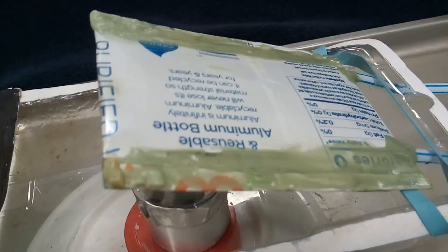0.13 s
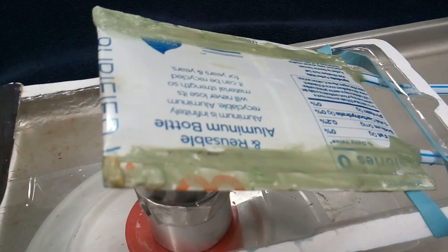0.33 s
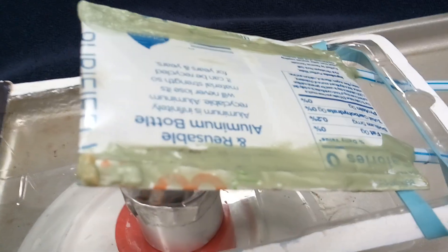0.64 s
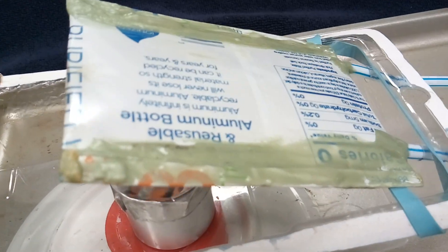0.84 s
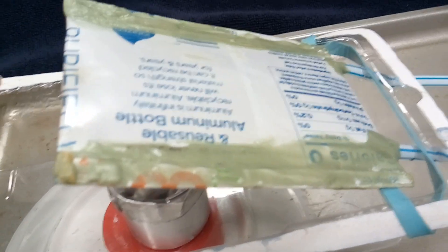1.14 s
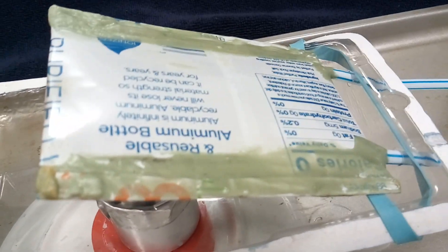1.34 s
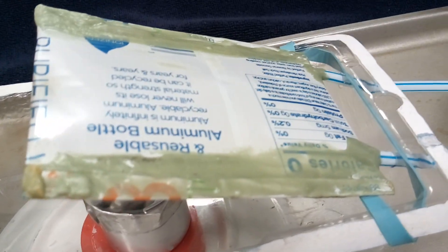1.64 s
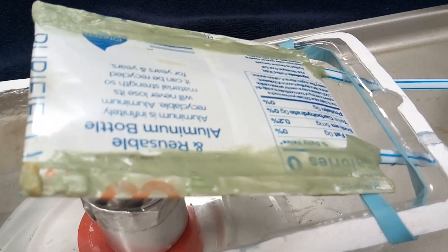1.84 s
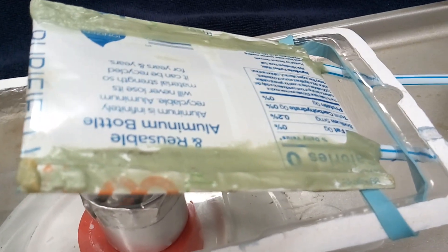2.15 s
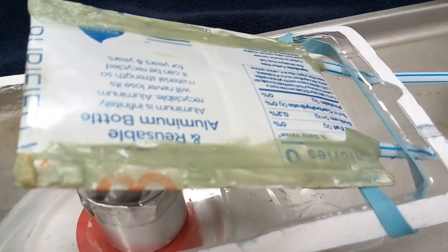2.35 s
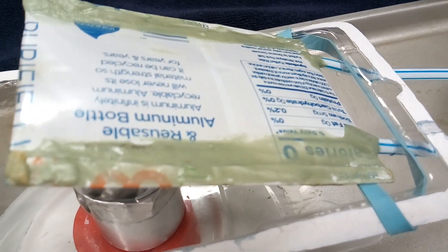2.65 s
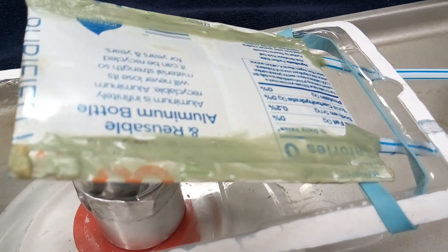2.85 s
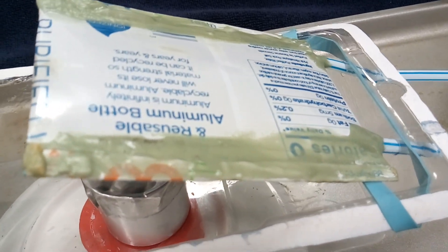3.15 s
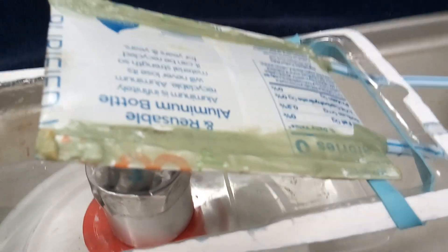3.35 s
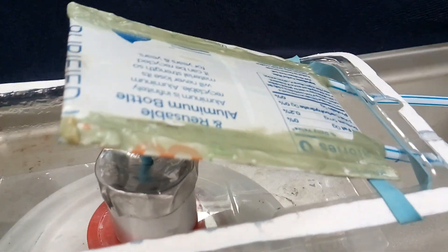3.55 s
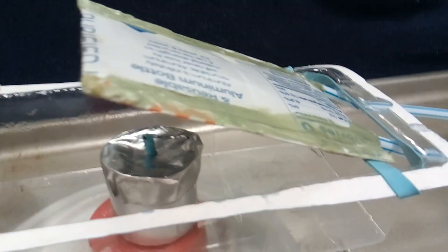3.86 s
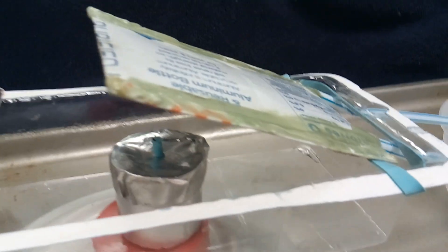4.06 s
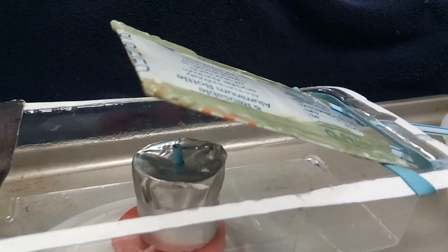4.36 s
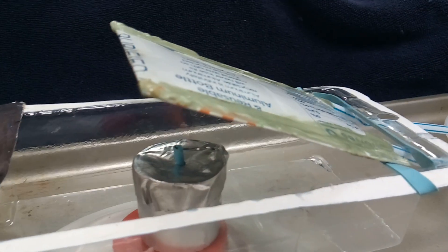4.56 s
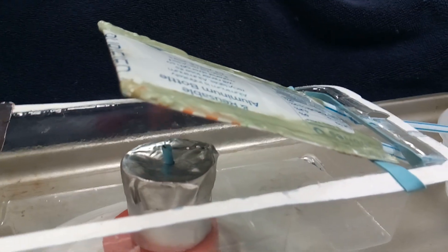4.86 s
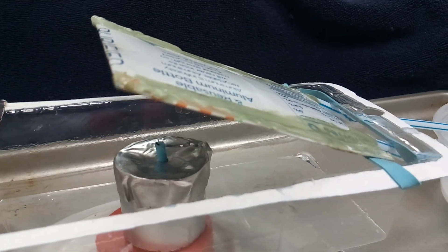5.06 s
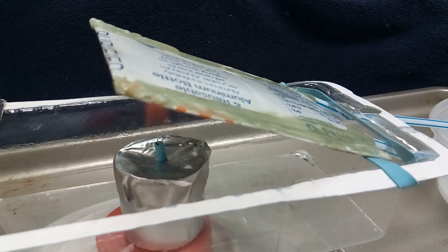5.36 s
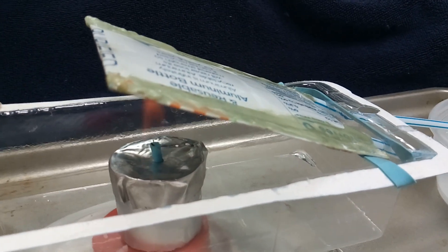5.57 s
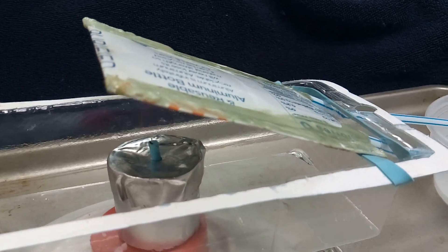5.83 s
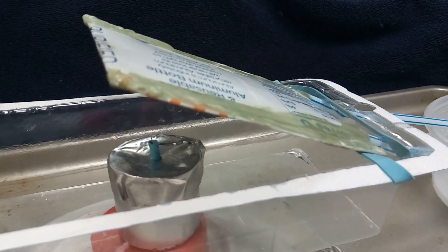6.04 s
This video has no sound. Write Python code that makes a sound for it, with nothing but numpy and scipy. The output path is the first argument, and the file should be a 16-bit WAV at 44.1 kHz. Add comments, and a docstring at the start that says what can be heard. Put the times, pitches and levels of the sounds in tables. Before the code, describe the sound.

A toy boat's candle-heated metal boiler pops steadily, a little over twice a second. Each bright, tinny snap is followed at once by a duller knock as the thin sheet flops back. Water sizzles faintly inside, with a few tiny high ticks. Near the end the pops turn softer and duller. The sound is close, with a short small-room ring over a low rumble and light hiss.

```python
"""A toy boat's candle-heated sheet-metal boiler: steam snaps the flat sheet out with a bright pop;
it flops back with a duller knock as the steam condenses. Each snap rings a small room and the low
resonances of stand and room. Water sizzles and ticks in the boiler over a low indoor rumble,
hiss and a faint whine."""
import sys
import numpy as np
from scipy import signal
from scipy.fft import rfft, irfft, next_fast_len
from scipy.io import wavfile
from scipy.ndimage import uniform_filter1d, map_coordinates

SR = 44100
rng = np.random.default_rng(int(sys.argv[2]) if len(sys.argv) > 2 else 0)


def master_out(mix):
    """Clip the mix to full scale and print it as 16-bit PCM to the path in sys.argv[1]."""
    frames = np.transpose(np.atleast_2d(mix))
    ceiling = np.clip(frames, -1, 1)
    pcm = np.round(ceiling * 32767).astype(np.int16)
    wavfile.write(sys.argv[1], SR, pcm)


N = 273420

# Sheet snaps out: start_s, thump_db, body_db, body_hz, rim_db, edge_db, edge_hz, sizzle_db
POPS = [(-0.055, -33.5, -20.5, 1366, -38, -47, 2960, -64.5), (0.381, -27, -20, 1330, -40, -40, 2870, -66.5),
        (0.8339, -26, -19, 1336, -37, -39.5, 2900, -66.5),
        (1.2847, -26.5, -19, 1340, -36.5, -39.5, 2890, -64),
        (1.7365, -26.5, -19.5, 1335, -38, -41.5, 2890, -66),
        (2.1812, -27.5, -19.5, 1333, -37, -40.5, 2910, -74.5),
        (2.6352, -29, -23, 1310, -41.5, -42.5, 2900, -66.5),
        (3.0866, -27, -22, 1280, -40, -47.5, 2870, -70), (3.5414, -26.5, -22, 1284, -39, -50, 2810, -71),
        (3.995, -27.5, -20.5, 1295, -35, -47, 2960, -72), (4.4478, -28.5, -21.5, 1306, -38, -50, 2940, -72),
        (4.893, -27.5, -21.5, 1306, -36, -46, 2950, -71), (5.3351, -27.5, -26, 1280, -52, -48, 2690, -68.5),
        (5.7856, -28, -28, 1253, -51, -54.5, 3040, -73)]
# Sheet flops back: start_s, thump_db, body_db, body_hz, rim_db, edge_db, edge_hz
KNOCKS = [(0.0925, -36, -29, 465, -31, -40.5, 1990), (0.5535, -36, -29, 474, -33, -48.5, 2060),
          (1.0035, -35, -28, 460, -33, -43.5, 1960), (1.4548, -37, -27.5, 480, -31.5, -41, 1990),
          (1.9035, -36.5, -29.5, 486, -32, -44.5, 2030), (2.3495, -37, -29.5, 465, -35, -44, 1980),
          (2.8015, -35, -31, 474, -33.5, -40.5, 1980), (3.2555, -35.5, -36, 465, -32, -44, 1970),
          (3.7095, -35.5, -28.5, 428, -29.5, -38.5, 1940), (4.1635, -36.5, -29, 434, -29, -38, 1980),
          (4.6095, -36.5, -28.5, 460, -32.5, -43, 1910), (5.0595, -36, -39.5, 515, -47, -61, 2000),
          (5.5055, -41, -47.5, 470, -48, -63, 2110), (5.9515, -35.5, -38.5, 377, -35, -50, 2020)]
# Brief swings per snap; thump is the whole sheet's low push: nominal_hz, peak_ms, rise_ms, fall_ms, gain_db
POP_BODY = [(1328, 1.108, 0.5, 0.56, 3), (1534, 4.695, 1.1, 1.8, -20.5), (1050, 3.5, 1.1, 1.8, -48),
            (618.4, 1.66, 3.6, 2.44, -19.5)]
POP_RIM = [(2138, 1.266, 1, 0.52, 3.5), (1900, 2.88, 0.27, 0.7, 1)]
POP_EDGE = [(2930, 1.304, 0.93, 2.5, -1), (3440, 1.1, 0.4, 0.76, -5.5), (5030, 1, 0.83, 0.93, -24),
            (6550, 0.46, 0.38, 1, -16)]
POP_THUMP = [(302, 3, 1.32, 1.91, -6), (460, -2.5, 3.4, 3.3, -23), (213, 19, 1.43, 4.5, -6)]
KNOCK_BODY = [(464, 2.81, 1.33, 2.34, -3), (669, 5.56, 1.76, 0.4, -5.5), (564, 6.26, 0.14, 2.3, -7.5)]
KNOCK_RIM = [(1154, 3.53, 1.1, 1.26, -3.5), (1522, 14, 4.6, 3.6, -22), (918, 7.16, 2.1, 0.74, -2)]
KNOCK_EDGE = [(1944, 3.6, 0.46, 2.13, -1), (2830, 2.45, 0.9, 0.52, -14.5), (3480, 3.5, 1.1, 2.1, -22),
              (6170, 8.2, 1.6, 1.6, -24.5)]
KNOCK_THUMP = [(232, 5.04, 0.87, 1.03, 5.5), (340, 1.46, 2.8, 0.54, -9.5), (211.4, 17.93, 1.96, 5, -2)]
# Low resonances of stand and room: pitch_hz, gain_db, t60_s
BOOM_MODES = [(94.7, -13, 0.94), (159.2, -6, 0.28), (215.9, -13, 0.28), (271.4, -20.5, 1), (327, -7, 0.19),
              (387, -15.5, 0.28), (441.6, -5, 0.14), (566, -10.5, 0.23), (634, -4.5, 0.14),
              (712, -2.5, .14), (848, -11.5, 0.18)]
# Room decay: freq_hz, t60_s
ROOM_DECAY = [(200, 0.54), (700, 0.27), (1400, 0.23), (3000, 0.36), (7000, 0.18)]
# Collapsing bubbles: start_s, level_db, pitch_hz, tap_gain_db
BUBBLES = [(0.3413, -45, 6400, -3), (0.8636, -44, 6160, -8), (0.925, -45, 4970, 13),
           (1.7945, -44, 6270, -9), (2.234, -40, 6450, -2), (2.2518, -43.5, 6600, 14),
           (2.622, -45, 6500, 12), (2.716, -48.5, 4170, 1), (3.515, -47.5, 6540, -8),
           (3.616, -52, 6950, 18), (3.815, -29.5, 6150, -19), (3.945, -42, 5150, 6), (5.1033, -47, 6060, 4),
           (5.3911, -50, 6450, 3), (5.5094, -55, 4670, -8), (5.8647, -51, 6700, 17.5)]
# Noise spectra: freq_hz, relative_density_db
SIZZLE_SPECTRUM = [(1500, -21), (3000, -6.5), (4300, -6.5), (5400, -5.5), (6500, 2), (7200, -5.5),
                   (8200, -45), (12000, -38)]
RUMBLE_SPECTRUM = [(15, -67), (25, -9.5), (43, -25.5), (91, -2), (137, 2), (238, -17.5), (477, -20),
                   (1200, -56), (1560, -101), (2640, -120)]
HISS_SPECTRUM = [(290, -31.5), (500, -0.5), (915, 1), (4020, -10), (5130, -11.5), (6650, -7), (8490, -19.5),
                 (13100, -23), (14900, -17.5), (15500, -8.5)]
# Rumble envelope: time_s, level_db
RUMBLE_LEVELS = [(0.0, -55), (0.26, -53.5), (1.28, -60.5), (1.5, -54.5), (2.12, -57), (2.68, -51.5),
                 (3.94, -61), (5.63, -54.5), (6.2, -61)]

RATTLE_BAND = signal.butter(3, [1100, 3800], "band", fs=SR, output="sos")
PRE_ONSET_S = 0.012
SCATTER_DB = 2.5  # mode spread, snap to snap


def sheet_snaps(events, body, rim, edge, thump, rattle_db, rattle_peak_s, wake_db, boom_db, boom_delay_s):
    """The sheet buckles: a click and a low push, both driving room tail and boom."""
    lead = SR // 4  # holds a snap begun before 0 s
    out = np.zeros(lead + N + SR)
    shared_tail = room_tail()
    t = np.arange(SR // 25) / SR - PRE_ONSET_S
    rattle_envelope = amp(-60 * np.abs(t - rattle_peak_s) / np.where(t < rattle_peak_s, 0.012, 0.035))
    for start_s, thump_db, body_db, body_hz, rim_db, edge_db, edge_hz, *_ in events:
        push = amp(thump_db) * sheet_swing(thump, thump[0][0])
        click = amp(body_db) * sheet_swing(body, body_hz)
        click += amp(rim_db) * sheet_swing(rim, rim[0][0])
        click += amp(edge_db) * sheet_swing(edge, edge_hz)
        # finer modes blur into a rattle
        rattle = signal.sosfilt(RATTLE_BAND, rattle_envelope * rng.standard_normal(len(t)))
        click += amp(edge_db + rattle_db) * rattle
        tail = 0.55 * shared_tail + 0.85 * room_tail()
        dullness_db = thump_db - body_db
        sound = amp(-7.5 + 0.3 * dullness_db) * signal.fftconvolve(click + amp(-6) * push, tail)
        boom_drive = push + amp(wake_db + dullness_db) * click
        sound += amp(boom_db) * signal.fftconvolve(boom_drive, boom(boom_delay_s))
        sound[:len(click)] += click + push
        out[lead + round((start_s - PRE_ONSET_S) * SR):][:len(sound)] += sound
    return out[lead:lead + N]


def sheet_swing(modes, pitch_hz):
    """A few cycles per mode under a skewed Gaussian; all tuned so the first lands on pitch_hz."""
    t_ms = (np.arange(SR // 25) / SR - PRE_ONSET_S) * 1000
    tuning = pitch_hz / modes[0][0]
    out = np.zeros(len(t_ms))
    for k, (hz, peak_ms, rise_ms, fall_ms, gain_db) in enumerate(modes):
        gain = amp(gain_db + SCATTER_DB * rng.normal() * (k > 0))
        width_ms = np.where(t_ms < peak_ms, rise_ms, fall_ms)
        envelope = np.exp(-0.5 * ((t_ms - peak_ms) / width_ms) ** 2)
        out -= gain * envelope * np.cos(2 * np.pi * hz * tuning * (t_ms - peak_ms) / 1000)
    return out


def boom(delay_s, swell_s=0.0072, waver_rad=1.2):
    """Stand and room modes swell and waver as echoes return; neighbours alternate in sign."""
    t = np.arange(SR // 2) / SR
    knots_s = np.arange(13) / 24
    ring = np.zeros(len(t))
    for k, (hz, gain_db, t60_s) in enumerate(BOOM_MODES):
        envelope = amp(gain_db + SCATTER_DB * rng.normal() - 60 * t / t60_s)
        drift_rad = np.interp(t, knots_s, waver_rad * rng.standard_normal(13) * (knots_s > 0))
        ring += (-1) ** k * envelope * np.sin(2 * np.pi * hz * t + drift_rad)
    ring *= 1 - np.exp(-t / swell_s)
    return np.pad(ring, (round(delay_s * SR), 0))[:len(t)]


def room_tail(build_up_s=0.004):
    """Diffuse reflections: noise decaying per band, unit energy."""
    hz, t, bands = signal.stft(rng.standard_normal(SR // 2), SR, nperseg=256)
    decay = amp(-60 * t / log_interp(ROOM_DECAY, hz)[:, None])
    tail = signal.istft(bands * decay, SR, nperseg=256)[1][:SR // 2]
    tail *= np.clip(np.arange(len(tail)) / SR / build_up_s, 0, 1) ** 2
    return tail / np.linalg.norm(tail)


def bubble_ticks():
    """Bubbles collapse on hot metal: two-tone ring, sharp spit, tap on the sheet, room tail."""
    out = np.zeros(N + SR)
    t = np.arange(SR // 50) / SR
    attack = (1 - np.exp(-t / 0.00048)) ** 2
    tap_tones = np.sin(2 * np.pi * 2900 * t) + np.sin(2 * np.pi * 4300 * t)
    for start_s, level_db, pitch_hz, tap_db in BUBBLES:
        phase = 2 * np.pi * pitch_hz * t
        ring = amp(-60 * t / 0.007) * (np.sin(phase) + 0.62 * np.sin(1.058 * phase))
        spit = amp(-17 - 60 * t / 0.0042) * np.sin(1.38 * phase)
        tap = amp(tap_db - 60 * t / 0.0021) * tap_tones
        click = amp(level_db) * attack * (ring + spit + tap)
        sound = amp(-6) * signal.fftconvolve(click, room_tail())
        sound[:len(click)] += click
        out[round(start_s * SR):][:len(sound)] += sound
    return out[:N]


def sizzle(simmer_db=-76.5, lag_s=0.02, rise_s=0.017, fall_s=0.062):
    """Water boils on the sheet in thin wavering bands, peaking just after each pop."""
    t = np.arange(N) / SR
    power = np.full(N, amp(simmer_db) ** 2)
    for start_s, *_, sizzle_db in POPS:
        peak_s = start_s + lag_s
        power += amp(sizzle_db) ** 2 * np.exp(-np.abs(t - peak_s) / np.where(t < peak_s, rise_s, fall_s))
    fizz = patchy_noise(SIZZLE_SPECTRUM, spread_db=4, bins=2, frames=14)
    flicker_db = 2 * wobble(14) + 0.5 * wobble(60)
    return np.sqrt(power) * amp(flicker_db) * fizz


def background(hiss_db=-70.5, whine_db=-103, whine_hz=13704):
    """Building rumble, steady hiss, faint whine."""
    t = np.arange(N) / SR
    rumble_db = np.interp(t, *np.transpose(RUMBLE_LEVELS)) + 1.2 * wobble(8)
    rumble = amp(rumble_db) * patchy_noise(RUMBLE_SPECTRUM, spread_db=0.8)
    hiss = amp(hiss_db) * patchy_noise(HISS_SPECTRUM, spread_db=0.2)
    whine = amp(whine_db) * np.sin(2 * np.pi * whine_hz * t + 1.5 * wobble(40))
    return rumble + hiss + whine


def patchy_noise(spectrum, spread_db, bins=5, frames=10):
    """Coloured noise, rms 1, with random gain patches of bins x frames."""
    bands = signal.stft(rng.standard_normal(N + 512), nperseg=512)[2]
    patches = uniform_filter1d(rng.standard_normal(bands.shape), bins, axis=0)
    patches = uniform_filter1d(patches, frames, axis=1)
    noise = signal.istft(bands * amp(spread_db * unit_rms(patches)), nperseg=512)[1][:N]
    return unit_rms(filtered(noise, lambda hz: amp(log_interp(spectrum, hz))))


def wobble(rate_hz):
    """Spline through random knots."""
    knots = rng.standard_normal(int(N * rate_hz / SR) + 4)
    return map_coordinates(knots, [np.arange(N) * rate_hz / SR])


def filtered(x, response):
    """Apply response(hz) by FFT."""
    size = next_fast_len(N + SR // 2)
    return irfft(rfft(x, size) * response(np.fft.rfftfreq(size, 1 / SR)), size)[..., :N]


def log_interp(points, hz):
    """Interpolate over log frequency."""
    knots_hz, values = np.transpose(points)
    return np.interp(np.log(hz + 1), np.log(knots_hz + 1), values)


def amp(db):
    """dB to gain."""
    return 10 ** (np.asarray(db) / 20)


def unit_rms(x):
    """Scale to rms 1."""
    return x / np.sqrt(np.mean(x ** 2) + 1e-20)


def scene():
    """Boiler and background, mono."""
    pops = sheet_snaps(POPS, POP_BODY, POP_RIM, POP_EDGE, POP_THUMP, rattle_db=-2.5,
                       rattle_peak_s=0.0019, wake_db=3.5, boom_db=-38.5, boom_delay_s=0.00704)
    knocks = sheet_snaps(KNOCKS, KNOCK_BODY, KNOCK_RIM, KNOCK_EDGE, KNOCK_THUMP, rattle_db=-4,
                         rattle_peak_s=0.005, wake_db=-4, boom_db=-42, boom_delay_s=0.00631)
    # the sheet's sounds are rolled off below about 90 Hz
    sheet = filtered(pops + knocks, lambda hz: (1j * hz / (90 + 1j * hz)) ** 2)
    return (sheet + bubble_ticks() + sizzle() + background())[None]


def record(dry):
    """Brick-wall low-pass."""
    cutoff_hz = 15560
    return filtered(dry, lambda hz: hz < cutoff_hz)


dry = scene()
out = record(dry)
master_out(out)
```